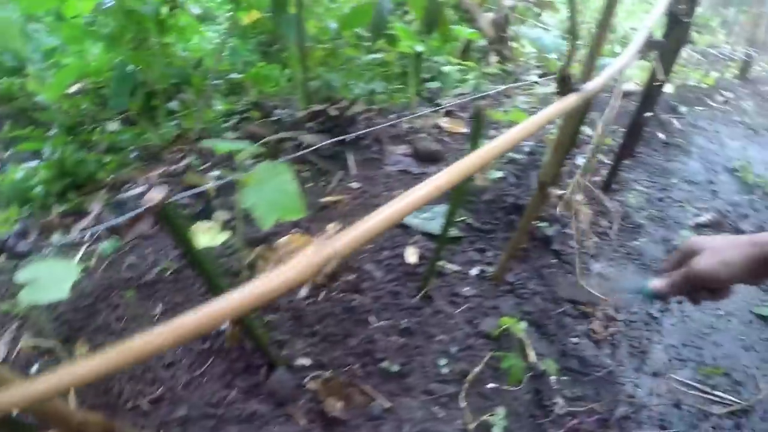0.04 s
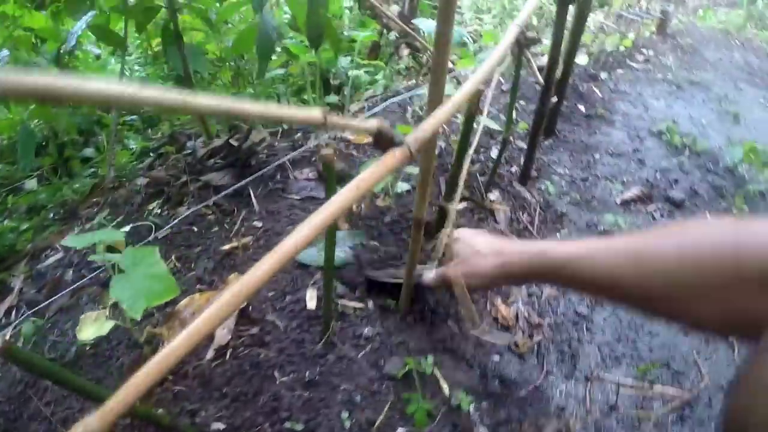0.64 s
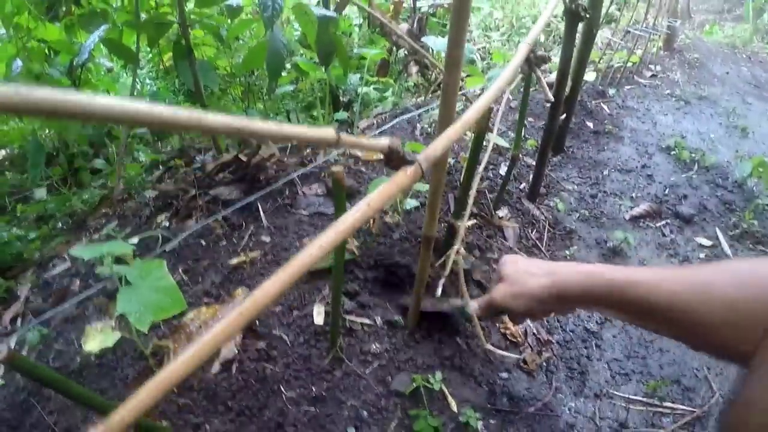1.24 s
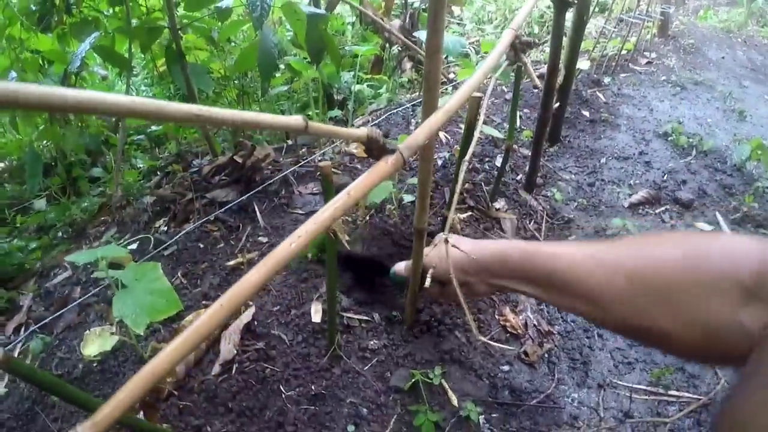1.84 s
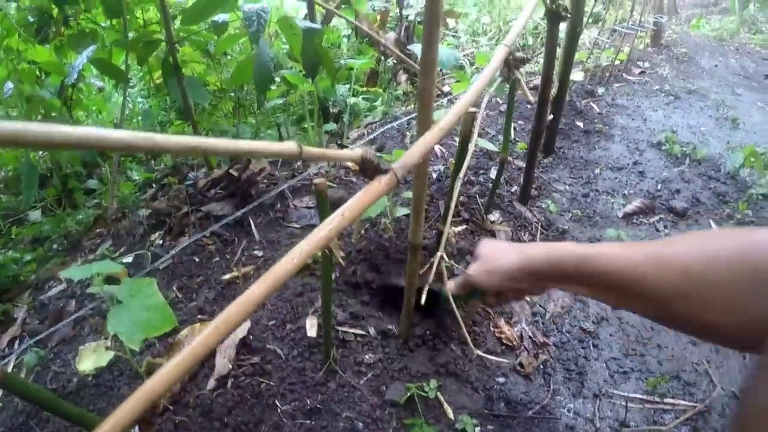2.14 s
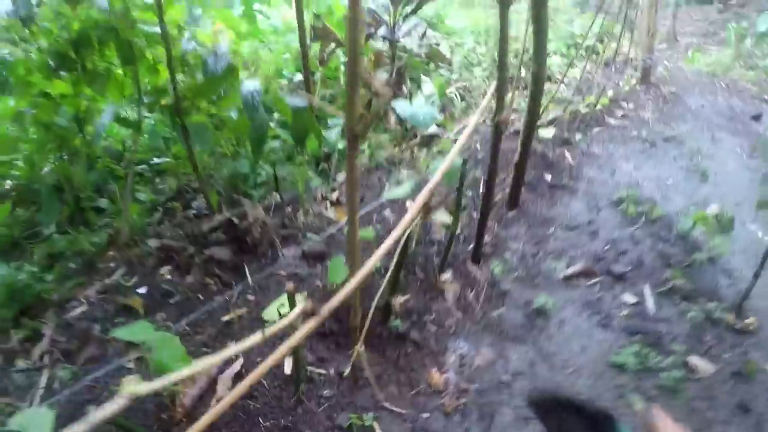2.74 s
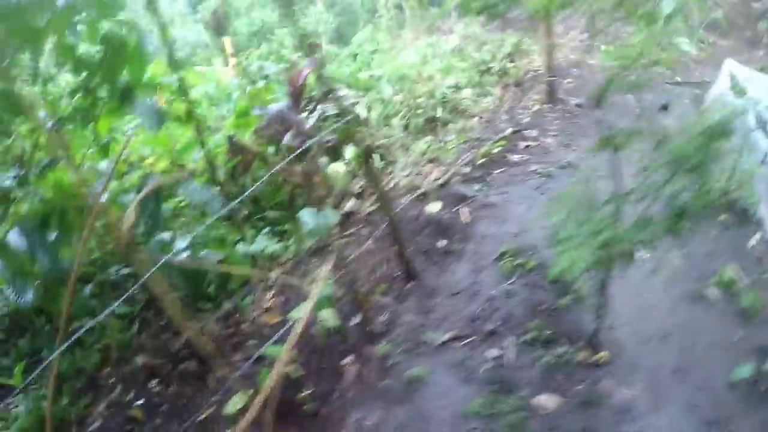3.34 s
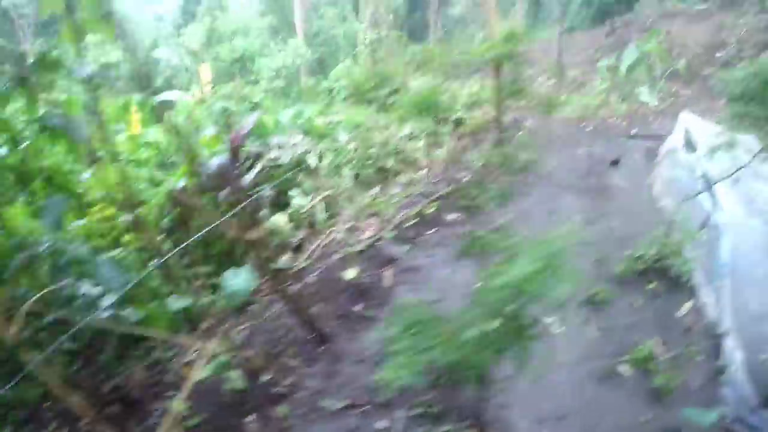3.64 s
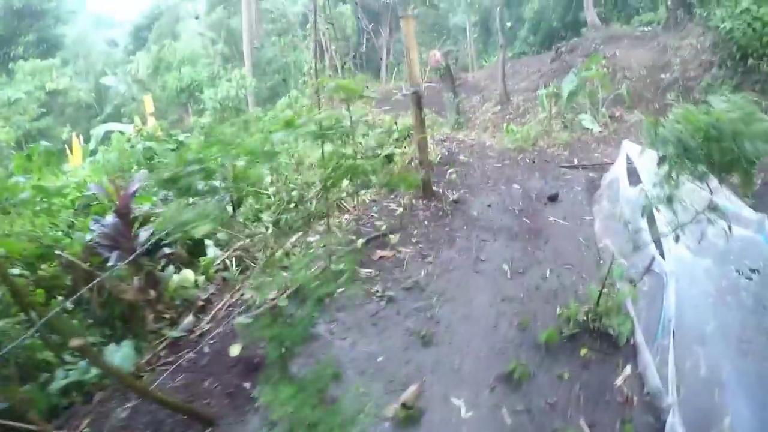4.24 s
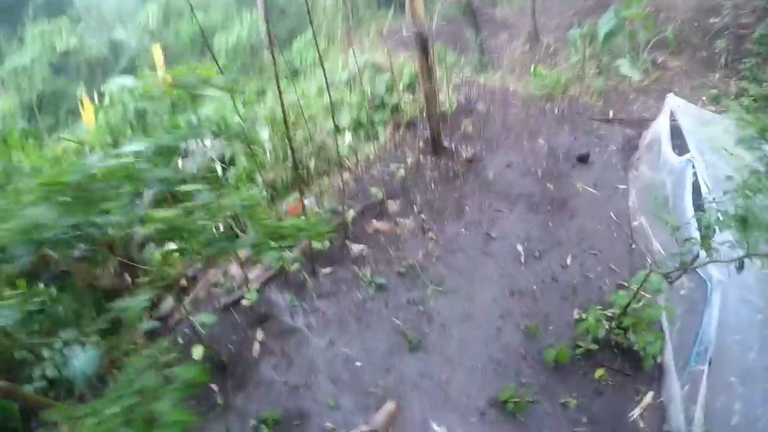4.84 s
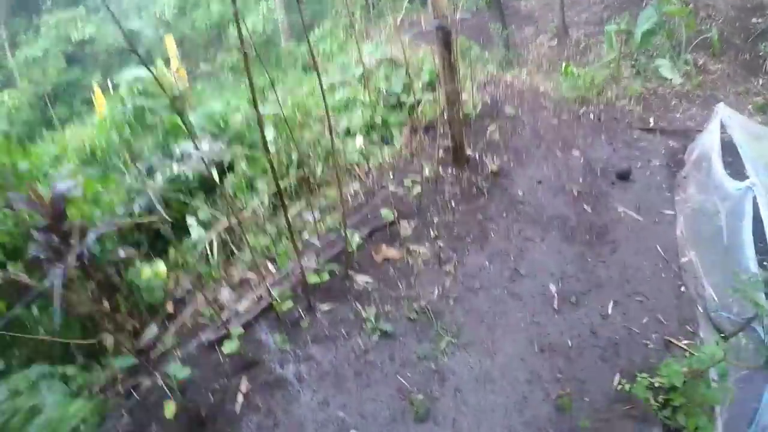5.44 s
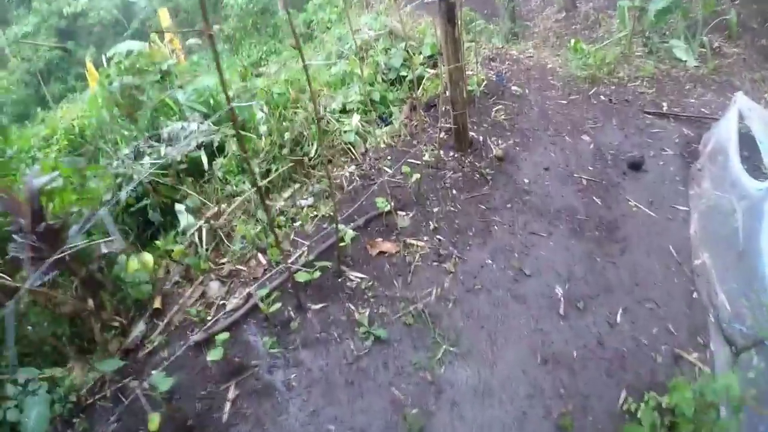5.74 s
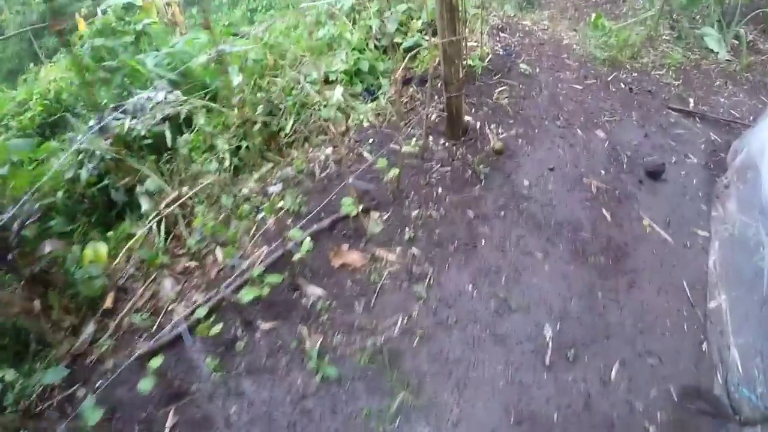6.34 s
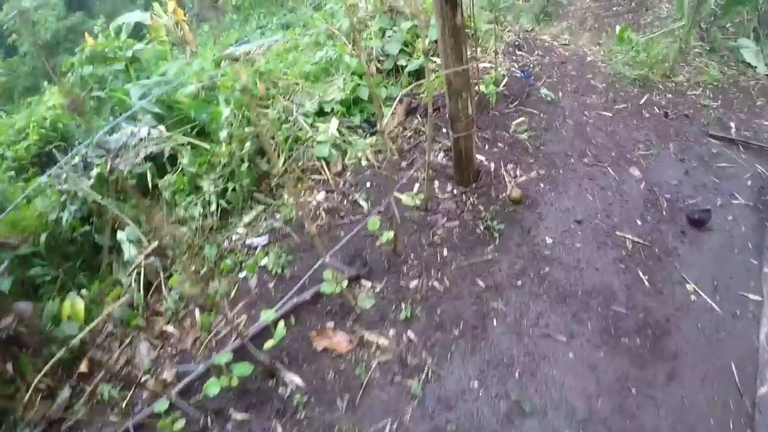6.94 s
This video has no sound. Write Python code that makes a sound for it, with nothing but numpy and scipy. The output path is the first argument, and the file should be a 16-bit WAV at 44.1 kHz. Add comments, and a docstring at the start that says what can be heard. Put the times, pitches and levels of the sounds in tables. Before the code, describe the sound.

Steady rain falls on a garden while a hand tool ticks in wet soil, then a drop hits the microphone with a sharp click.

```python
"""Vegetable garden in steady rain, breeze on the microphone of a hand-held camera.
Far drops merge to a wash, near ones tick on leaves; a hand tool scrapes and ticks in wet grit.
Stray drops ring the camera body, knocks and handling thump it, its electronics whine faintly.
One drop hits the microphone port: an overloaded click, then the gain ducks and a water film
hisses and veils the rain until the port clears."""
import sys
import numpy as np
from scipy import signal
from scipy.fft import rfft, irfft
from scipy.io import wavfile
from scipy.ndimage import uniform_filter1d

SR = 44100
rng = np.random.default_rng(int(sys.argv[2]) if len(sys.argv) > 2 else 0)


def unload_wav(signal):
    """Save mono or channel-first audio to the path in sys.argv[1] as 16-bit WAV at rate SR, clipped to [-1, 1]."""
    wavfile.write(
        sys.argv[1],
        SR,
        np.round(np.clip(np.atleast_2d(signal).T, -1, 1) * 32767).astype(np.int16),
    )


N = 311697
TIME = np.arange(N) / SR
SPLAT_S = 3.733  # drop hits the port

# rain wash spectrum: f/Hz, level/dB
RAIN_SPECTRUM = [(150, -18), (300, -10), (500, -12.5), (800, -9.5), (1400, -5), (1950, -11), (3000, -13.5),
                 (4400, -8.5), (5000, -14.5), (6400, -14), (7200, -22), (9300, -22), (10800, -28.5),
                 (13500, -24), (15000, -33)]
# port resonances lifting the wash: f/Hz, width/Hz, lift/dB
PORT_RESONANCES = [(987, 166, 9.3), (2507, 353, 11.8), (3626, 516, 13.96)]
# fine spray off near leaves: f/Hz, level/dB
SPRAY_SPECTRUM = [(2000, -16), (4000, 6), (6500, 6), (9000, -8), (11000, -9), (13500, -6), (15000, -21)]
# port modes rung by the drop: f/Hz, level/dB, t60/s
PORT_MODES = [(530, -12.5, 0.019), (683, -4, 0.013), (1022, 1.5, 0.017), (1374, -2.5, 0.012),
              (1705, -11, 0.059), (1805, -29, 0.19), (2140, -21, 0.024), (2770, -22, 0.012),
              (3220, -12.5, 0.023), (2760, -49, 0.15), (3200, -48, 0.22)]
# crack of that drop: f/Hz, level/dB
CRACK_SPECTRUM = [(300, -2), (1500, -9), (3200, 9.5), (5500, -1), (9000, -11), (15000, -24)]
# hiss of the wet port: f/Hz, level/dB
FILM_SPECTRUM = [(71, -6.5), (120, -6.5), (569, -18), (1180, -22.5), (1560, -20), (2480, -22.5),
                 (2860, -21), (3300, -20.5), (15000, -35)]
# turbulence at the port: f/Hz, level/dB
WIND_SPECTRUM = [(8.8, -38), (15, 8), (35, -0.5), (86, -9.5), (162, -27), (233, -27.5), (432, -40),
                 (500, -45.5), (650, -46), (1100, -120)]
# breeze contour: t/s, level/dB
WIND_CONTOUR = [(0.0, -35.5), (0.27, -34.5), (1.36, -41.5), (2.03, -41.5), (2.44, -39), (3.7, -36),
                (3.92, -38), (4.53, -45.5), (4.82, -39), (5.12, -42.5), (6.63, -39), (7.07, -41.5)]
# drops on the camera body: t/s, shell/dB, hollow/dB, push/dB
BODY_DROPS = [(0.1898, -16.5, -22.5, -39), (0.3207, -18, -17.5, -33), (0.3484, -24, -18.5, -18),
              (0.37, -35, -34, -27), (2.341, -34, -37, -33.5), (3.065, -50, -31.5, -24),
              (3.416, -23.5, -25.5, -26), (5.389, -15.5, -33, -47), (5.865, -44, -40.5, -39)]
# camera shell: f/Hz, level/dB, t60/s
SHELL_MODES = [(1370, 0, 0.0053), (1930, -1.5, 0.011), (1920, -10, 0.04), (2380, -1, 0.01)]
# hollow behind the shell: f/Hz, level/dB, t60/s
HOLLOW_MODES = [(343, -6.5, 0.017), (483, -6.5, 0.023), (619, 2.5, 0.019), (654, 1.5, 0.019),
                (1020, -8, 0.012)]
# low thumps on the camera, from knocks and handling: t/s, level/dB, width/s
LOW_THUMPS = [(0.286, -21, 0.0014), (0.326, -13, 0.0049), (0.35, -15, 0.0046), (0.416, -28, 0.0055),
              (0.477, -21.5, 0.0043), (1.46, -31.5, 0.00075), (3.222, -26, 0.0015), (3.678, -28, 0.0018),
              (5, -23.5, 0.001), (5.711, -26.5, 0.0015), (6.59, -25, 0.0025)]
# blade on grit, near drops on leaves: t/s, dull/dB, bright/dB, snap/dB
TICK_HITS = [(0.0985, -41, -30, -43), (0.122, -42, -47, -25.5), (0.6578, -25, -24.5, -26.5),
             (0.6696, -30, -34, -32), (0.9495, -38, -26.5, -33), (0.990, -25, -28, -19.5),
             (1.03, -29, -33, -28), (1.35, -27, -35, -38), (1.805, -32, -25.5, -36),
             (2.0376, -46, -25, -30), (2.2622, -27.5, -44, -44), (2.446, -27, -37, -44),
             (2.658, -27, -39, -41), (2.786, -30, -32, -41), (3.280, -32, -32, -34), (4.529, -29, -33, -26),
             (6.594, -48, -45, -32), (6.6442, -25.5, -37, -33), (6.734, -41, -32, -44)]
# dull ring of a tick: f/Hz, level/dB, t60/s
DULL_MODES = [(994, -2, 0.018), (1743, 1.5, 0.027), (2040, 6.5, 0.0064), (2500, 3, 0.017)]
# bright ring of a tick: f/Hz, level/dB, t60/s
BRIGHT_RING_MODES = [(3360, -3.5, 0.03), (3940, 2.5, 0.013), (4440, -2, 0.011)]
# snap of a grain or drop: f/Hz, level/dB
SNAP_SPECTRUM = [(1500, -8), (3000, 3), (4300, 8), (6500, 0.5), (9000, -7.5), (15000, -17)]
# blade strokes in soil: t/s, length/s, level/dB
BLADE_STROKES = [(0.527, 0.2, -53.5), (0.886, 0.1, -45.5), (0.996, 0.061, -56), (1.763, .08, -54),
                 (1.997, 0.074, -52), (2.28, 0.11, -56)]


def gain_of(db):
    """dB to amplitude."""
    return 10 ** (np.asarray(db) / 20)


def unit_rms(x):
    """Scale to rms 1."""
    return x / np.sqrt(np.mean(x ** 2) + 1e-20)


def coloured(x, spectrum):
    """Filter by rows of f/Hz, level/dB."""
    hz, db = np.transpose(spectrum)
    bins_hz = np.fft.rfftfreq(len(x), 1 / SR)
    response_db = np.interp(np.log(bins_hz + 1), np.log(hz + 1), db)
    return irfft(rfft(x) * gain_of(response_db), len(x))


def add(mix, start_s, sound):
    """Mix in at start_s."""
    part = mix[max(round(start_s * SR), 0):][:len(sound)]
    part += sound[:len(part)]


def drift(cutoff_hz):
    """Slow random wander, rms 1."""
    passband = np.fft.rfftfreq(N, 1 / SR) < cutoff_hz
    return unit_rms(irfft(rfft(rng.standard_normal(N)) * passband, N))


def patter(per_s, spread_db):
    """Random impacts: many small, few large."""
    size = gain_of(spread_db * np.minimum(rng.exponential(1, N), 5)) * rng.choice([-1, 1], N)
    return size * (rng.random(N) < per_s / SR)


def ring(modes, scatter):
    """Decaying modes, peak 1; each blow lands elsewhere and shifts level and pitch."""
    t = TIME[:SR // 4]
    out = np.zeros(len(t))
    for k, (hz, db, t60_s) in enumerate(modes):
        level_shift, detune = scatter * rng.standard_normal(2)
        envelope = gain_of(db + 20 * level_shift - 60 * t / t60_s)
        out += (-1) ** k * envelope * np.sin(2 * np.pi * hz * (1 + detune) * t)
    return out / abs(out).max()


def push(width_s, leak_hz):
    """Rounded pressure pulse, peak 1; swings back as the air leaks away."""
    u = TIME[:SR // 4] / width_s
    leak = signal.butter(2, leak_hz, "high", fs=SR, output="sos")
    out = signal.sosfilt(leak, u ** 2 * np.exp(-u))
    return out / abs(out).max()


def rain():
    """Far drops merge to a wash, nearer ones patter on leaves and mud; the port resonates."""
    far = rng.standard_normal(N) * gain_of(0.78 * drift(cutoff_hz=22))
    near = gain_of(-4.5) * unit_rms(patter(per_s=2000, spread_db=3))
    wash = coloured(far + near, RAIN_SPECTRUM)
    hz = np.geomspace(50, 16000, 400)
    lift_db = sum(db * np.exp(-((hz - centre_hz) / width_hz) ** 2)
                  for centre_hz, width_hz, db in PORT_RESONANCES)
    return gain_of(-43.5) * unit_rms(coloured(wash, np.c_[hz, lift_db]))


def port_splat(crack_t60_s=0.018):
    """A drop hits the port: ring, crack, heavy push."""
    out, t = np.zeros(N), TIME[:SR // 16]
    burst = rng.standard_normal(len(t)) * gain_of(-60 * t / crack_t60_s)
    add(out, SPLAT_S, gain_of(14.5) * ring(PORT_MODES, scatter=0))
    add(out, SPLAT_S, gain_of(-9) * coloured(burst, CRACK_SPECTRUM)[:len(t) // 2])
    add(out, SPLAT_S + 0.00027, gain_of(10.5) * push(width_s=0.0014, leak_hz=44))
    return out


def film_veil(film_s=0.63, clear_s=0.26):
    """Gain on the rain: a water film covers the port, then opens."""
    veil_db = np.interp(TIME - SPLAT_S, [0, film_s, film_s + clear_s], [-5, -5.5, 0], left=0)
    return gain_of(veil_db)


def film_hiss(hold_s=0.605, fade_db_per_s=340):
    """The film hisses on the port until it breaks."""
    age_s = TIME - SPLAT_S
    fade_db = fade_db_per_s * np.maximum(age_s - hold_s, 0)
    hiss = unit_rms(coloured(rng.standard_normal(N), FILM_SPECTRUM))
    return (age_s > 0) * gain_of(-42 - fade_db) * hiss


def wind(lift_db=4.5, gust_db=1):
    """Low turbulence at the port; levelled, so contour and gusts alone set the swell."""
    eddies = coloured(rng.standard_normal(N), WIND_SPECTRUM)
    running_rms = np.sqrt(uniform_filter1d(eddies ** 2, size=SR // 6))
    contour_db = np.interp(TIME, *np.transpose(WIND_CONTOUR))
    return eddies / running_rms * gain_of(contour_db + lift_db + gust_db * drift(cutoff_hz=2.4))


def body_knocks(rebound_s=0.014, rebound_db=-15.5):
    """Drops ring shell and hollow and shove the microphone; knocks and handling add low thumps."""
    out = np.zeros(N)
    shove = -push(width_s=0.0015, leak_hz=35)
    for start_s, shell_db, hollow_db, push_db in BODY_DROPS:
        thud = ring(HOLLOW_MODES, scatter=0.025)
        add(out, start_s, gain_of(shell_db) * ring(SHELL_MODES, scatter=0.04))
        add(out, start_s, gain_of(hollow_db) * thud + gain_of(push_db) * shove)
        add(out, start_s + rebound_s, gain_of(hollow_db + rebound_db) * thud)  # casing springs back
    for start_s, db, width_s in LOW_THUMPS:
        add(out, start_s, gain_of(db) * push(width_s, leak_hz=45.3))
    grip_shifts = patter(per_s=5, spread_db=3)
    out += gain_of(-44) * signal.oaconvolve(grip_shifts, push(width_s=0.0024, leak_hz=45.3))[:N]
    casing_lowpass = signal.butter(6, 2800, fs=SR, output="sos")
    return signal.sosfilt(casing_lowpass, out)


def ticks(snap_t60_s=0.0073):
    """Blade on grit, drops on leaves: a snap with a dull and a bright ring."""
    out, t = np.zeros(N), TIME[:SR // 16]
    for start_s, dull_db, bright_db, snap_db in [*TICK_HITS, *drips(count=12)]:
        burst = rng.standard_normal(len(t)) * gain_of(-60 * t / snap_t60_s)
        snap = coloured(burst, SNAP_SPECTRUM)[:len(t) // 2]
        add(out, start_s, gain_of(dull_db) * ring(DULL_MODES, scatter=0.046))
        add(out, start_s, gain_of(bright_db) * ring(BRIGHT_RING_MODES, scatter=0.055))
        add(out, start_s, gain_of(snap_db) * snap / abs(snap).max())
    return out


def drips(count, mean_db=(-40.5, -39.5, -41), spread_db=4.5):
    """Faint random drops on leaves; columns as TICK_HITS."""
    starts_s = rng.uniform(0, N / SR, count)
    return np.c_[starts_s, mean_db + spread_db * rng.standard_normal((count, 3))]


def scrapes():
    """Soil grains slip along the blade on each stroke."""
    pressure = np.zeros(N)
    for start_s, length_s, db in BLADE_STROKES:
        add(pressure, start_s, gain_of(db) * np.sin(np.linspace(0, np.pi, int(length_s * SR))))
    grit = patter(per_s=2200, spread_db=2.5)
    return pressure * unit_rms(coloured(grit, SNAP_SPECTRUM))


def spray():
    """Tiny separate droplets off near leaves."""
    droplets = patter(per_s=170, spread_db=2.2)
    return gain_of(-66) * unit_rms(coloured(droplets, SPRAY_SPECTRUM))


def camera_whine(tone_hz=14176, frame_hz=30):
    """Faint electronic tone, on for half of each frame."""
    gate = np.sin(2 * np.pi * frame_hz * TIME) < 0
    return gain_of(-60.5) * gate * np.sin(2 * np.pi * tone_hz * TIME)


def scene():
    """Mono sum at the microphone."""
    garden = (rain() + spray()) * film_veil() + ticks() + scrapes()
    return (garden + wind() + body_knocks() + port_splat() + film_hiss() + camera_whine())[None]


def record(dry, threshold_db=-7, attack_s=0.011, release_db_per_s=20, cutoff_hz=15400):
    """Gain ducks fast on overload and creeps back; then saturation and band limit."""
    power_db = 10 * np.log10(abs(uniform_filter1d(dry[0] ** 2, size=128)) + 1e-12)
    demand_db = np.clip(4 * (power_db - threshold_db), 0, 12.5)
    recovery_db = release_db_per_s * TIME
    held_db = np.maximum.accumulate(demand_db + recovery_db) - recovery_db
    pole = np.exp(-1 / (attack_s * SR))
    ducked = dry * gain_of(-signal.lfilter([1 - pole], [1, -pole], held_db))
    saturated = ducked / (1 + ducked ** 4) ** (1 / 4)
    lowpass = signal.firwin(255, cutoff_hz, window=("kaiser", 8), fs=SR)
    return signal.oaconvolve(saturated, lowpass[None], "same")


dry = scene()
out = record(dry)
unload_wav(out)
```